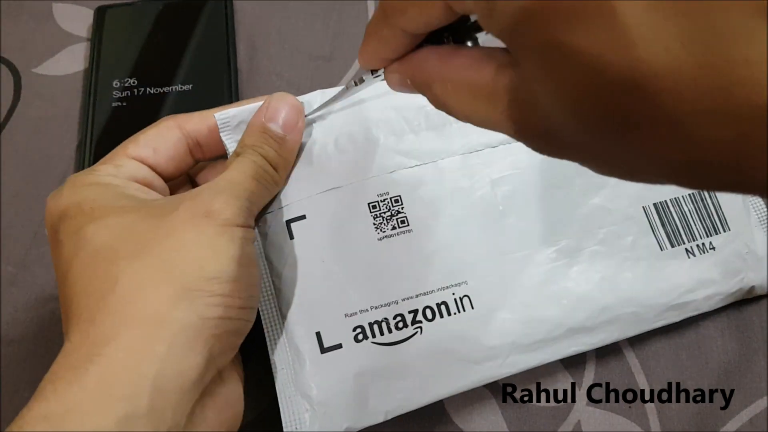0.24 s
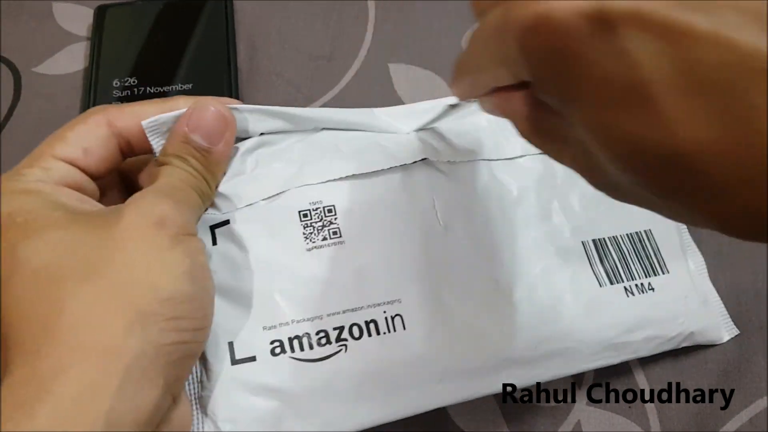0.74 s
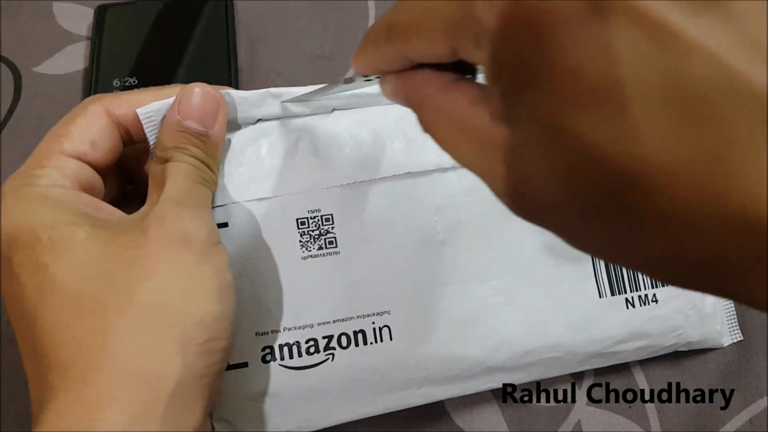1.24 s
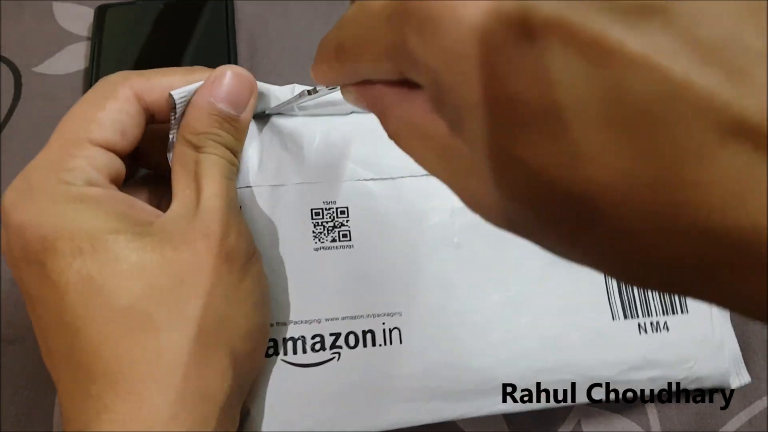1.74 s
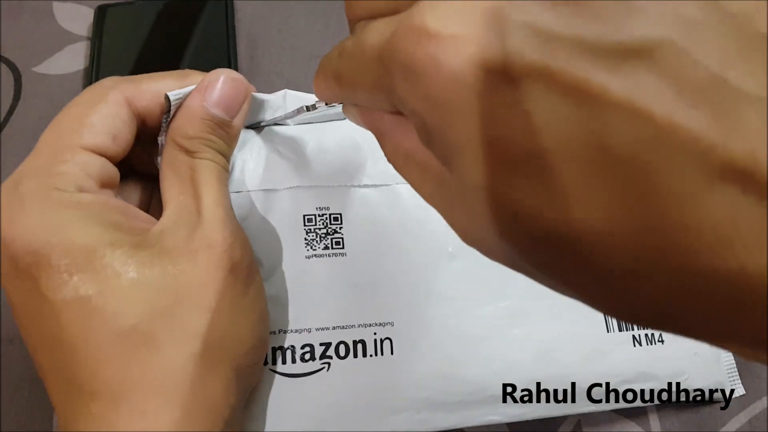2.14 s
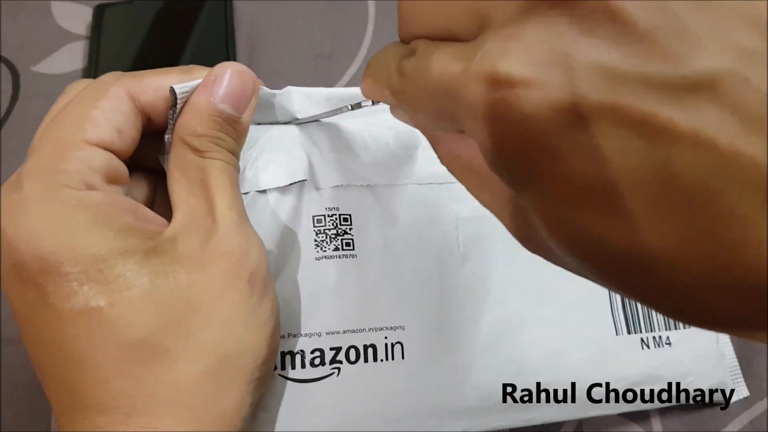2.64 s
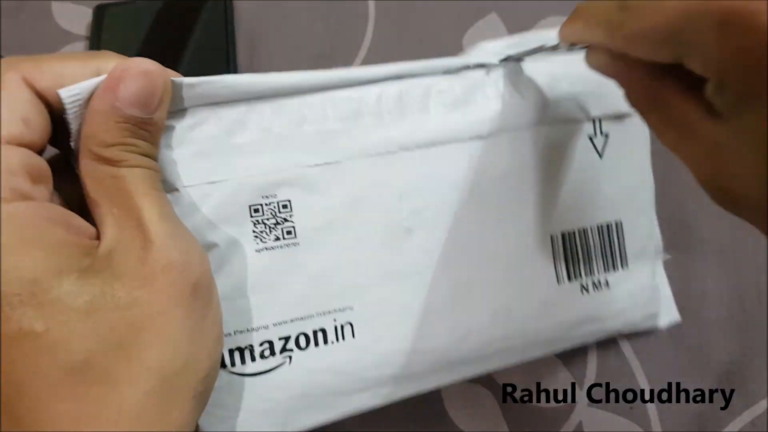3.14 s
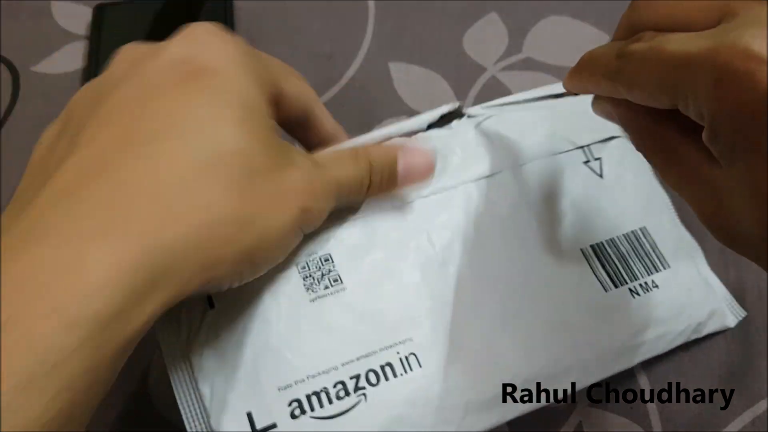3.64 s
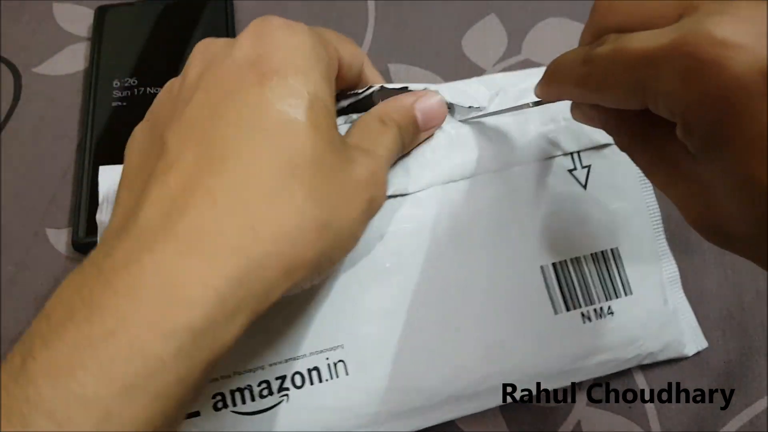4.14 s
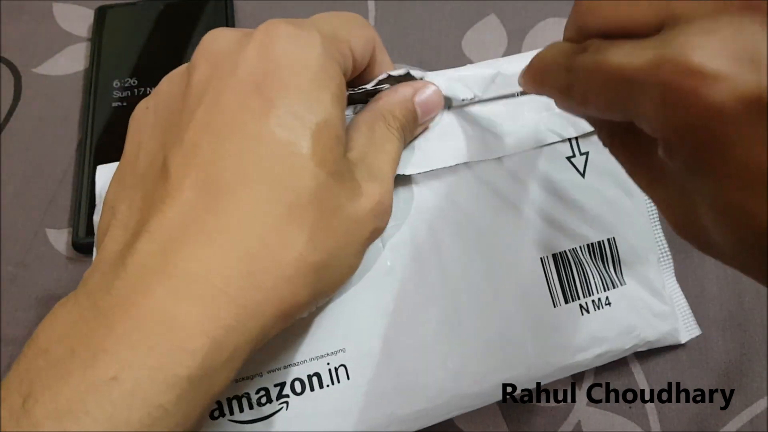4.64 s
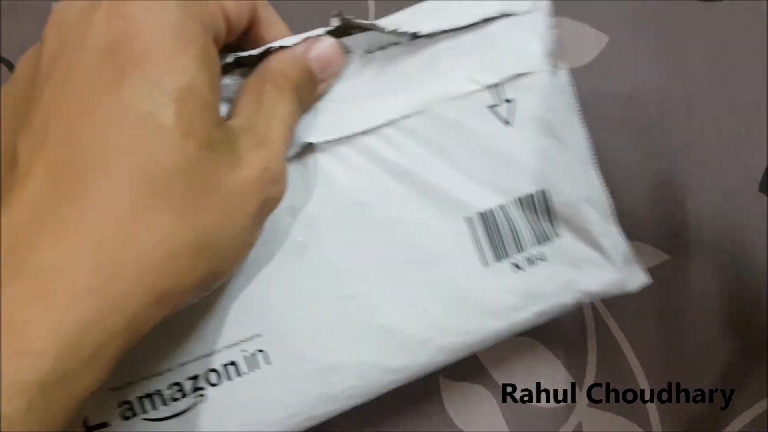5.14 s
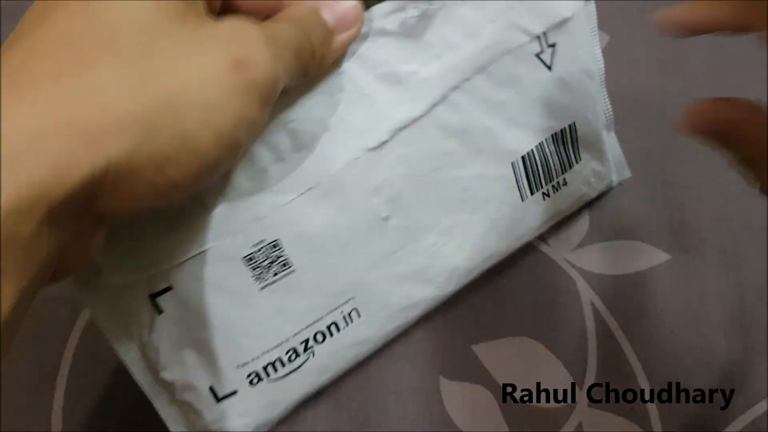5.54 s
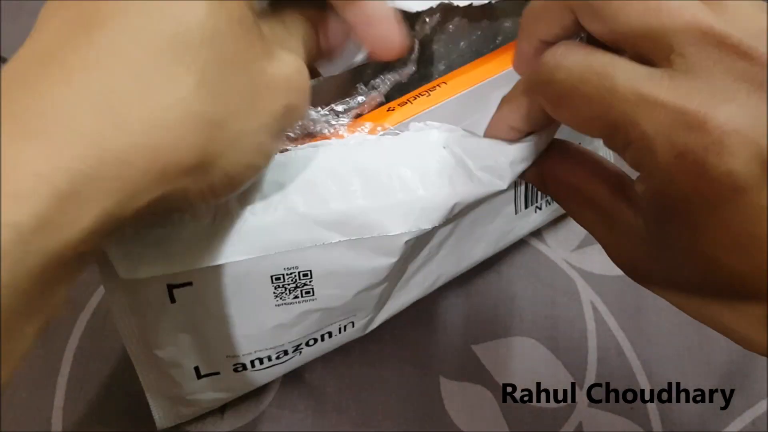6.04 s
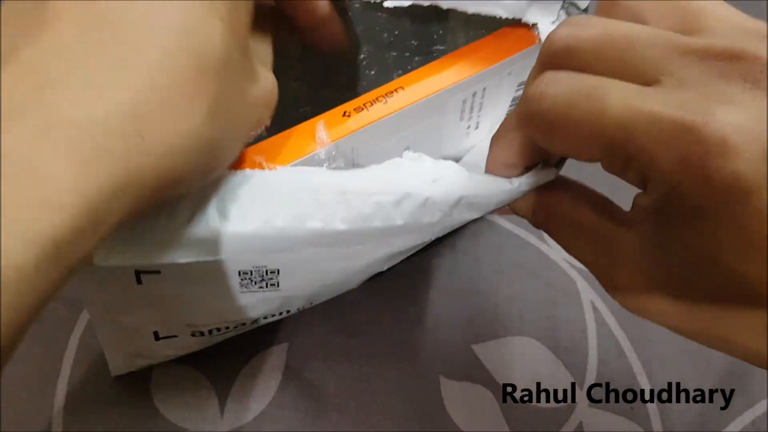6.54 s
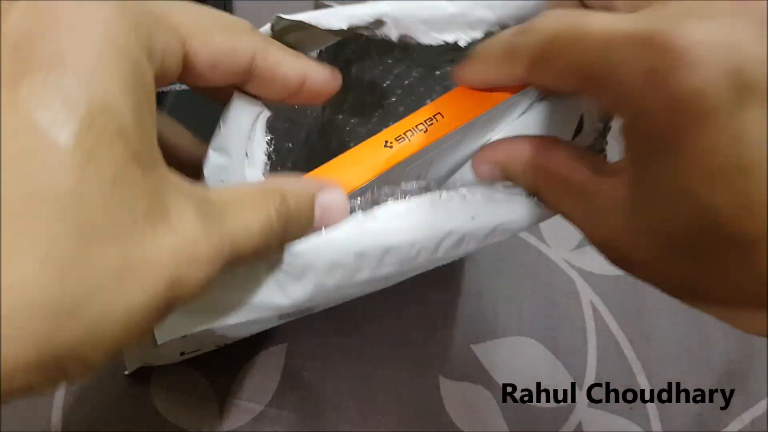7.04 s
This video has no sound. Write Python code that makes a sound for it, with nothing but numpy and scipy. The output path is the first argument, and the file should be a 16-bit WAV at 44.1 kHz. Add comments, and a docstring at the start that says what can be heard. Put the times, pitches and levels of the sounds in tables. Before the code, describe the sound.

A padded plastic mailer is slit and torn open close to a phone microphone in a soft room. Light crinkles and small snaps come first, then a dense rip near three seconds and a louder one near five. The bag slides briefly, lands with a soft low thud, and fingers rustle the film and bump a box inside. Faint rumble and intermittent hum lie beneath.

```python
"""A padded plastic mailer is slit with a knife and pulled open, close to a two-port phone microphone in a soft room.
From the start there is still air, a deep rumble and a low hum that comes and goes: filtered noise and a sine.
Fingers rustle the film, as creased noise, and it tears in runs of sharp snaps, densest near 3 s and 5 s: slips
that ring film and bag, answered by the room. From about 5 s a second low tone joins, the bag slides over the
sheet, fingertips bump the box inside, and the parcel thuds on the mattress, with a fainter thud just after."""
import sys
import numpy as np
from scipy import signal
from scipy.fft import rfft, irfft, next_fast_len
from scipy.io import wavfile
from scipy.ndimage import uniform_filter1d, map_coordinates

SR = 44100
rng = np.random.default_rng(int(sys.argv[2]) if len(sys.argv) > 2 else 0)


def file_out(sig):
    """Save sig as 16-bit WAV at sys.argv[1]."""
    # one column per channel
    cols = np.atleast_2d(sig).T
    # limit, then scale
    lim = np.clip(cols, -1, 1)
    pcm = np.round(lim * 32767).astype(np.int16)
    wavfile.write(sys.argv[1], SR, pcm)


def convert_level_to_amplitude(level_db):
    """Map a level in decibels to its linear amplitude factor."""
    exponent = np.asarray(level_db, float) / 20
    return 10 ** exponent


N = 321930  # length [samples]


def unit(x):
    """Scales a sound to rms 1."""
    return x / np.sqrt(np.mean(x ** 2) + 1e-20)


def along(points, hz):
    """Reads (frequency [Hz], value) points on a log frequency axis."""
    f, v = np.transpose(points)
    return np.interp(np.log(hz + 1), np.log(f + 1), v)


def level_curve(rows):
    """Draws (time [s], level [dB]) rows as one level per sample, -120 dB outside them."""
    s, db = np.transpose(rows)
    return np.interp(np.arange(N) / SR, s, db, left=-120, right=-120)


def wobble(rate):
    """A smooth random curve through normal draws, rate knots a second."""
    knots = rng.standard_normal(int(N * rate / SR) + 4)
    return map_coordinates(knots, [np.arange(N) * rate / SR])


def noise_pair():
    """Two unrelated white noises."""
    return rng.standard_normal((2, N))


def filtered(x, response):
    """Applies a complex response of frequency along the last axis."""
    n = x.shape[-1]
    m = next_fast_len(n + 4096)
    return irfft(rfft(x, m) * response(np.fft.rfftfreq(m, 1 / SR)), m)[..., :n]


def band(lo_hz, hi_hz):
    """The response of a causal band-pass."""
    sections = signal.butter(2, [lo_hz, hi_hz], "band", fs=SR, output="sos")
    return lambda f: signal.sosfreqz(sections, f, fs=SR)[1]


# how alike the two ports hear a diffuse sound: (frequency [Hz], correlation [0 to 1])
PORT_LIKENESS = [(60, 0.9), (240, 0.84), (950, 0.4), (3770, 0.02), (15000, 0.033)]


def coloured(pair, spectrum):
    """Filters and mixes two unrelated signals into stereo of rms 1, more alike in the bass."""
    def mid_side(hz):
        turn = np.arccos(np.clip(along(PORT_LIKENESS, hz), -1, 1)) / 2
        return convert_level_to_amplitude(along(spectrum, hz)) * [np.cos(turn), np.sin(turn)]
    mid, side = filtered(pair, mid_side)
    return unit(np.array([mid + side, mid - side]))


# colour of the still room: (frequency [Hz], relative gain [dB])
AIR_COLOUR = [(12, -53), (20, -18), (43, -0.5), (105, 7), (440, -7.5), (772, -7.5), (939, -13),
              (2370, -16.5), (4050, -22), (7300, -39), (8890, -22), (15200, -46), (16500, -49)]


def still_air():
    """Steady noise of the still room."""
    return convert_level_to_amplitude(-61.0) * coloured(noise_pair(), AIR_COLOUR)


# the deep rumble rising and sinking: (time [s], level [dB])
RUMBLE_LEVEL = [(0, -63), (0.12, -50), (0.87, -65), (1.1, -74), (2.9, -74), (3.09, -63), (3.3, -86),
                (4.06, -65), (4.39, -64), (4.9, -70), (5.37, -82), (5.51, -46), (5.8, -66), (7.3, -72)]


def deep_rumble():
    """Noise below about 90 Hz that follows a drawn level."""
    colour = [(15, -8), (28, -15), (33, 1.0), (38, -34), (60, -5), (90, -87)]  # Hz, dB
    return convert_level_to_amplitude(level_curve(RUMBLE_LEVEL)) * coloured(noise_pair(), colour)


def tone(hz, tables, waver_hz):
    """A low sine of slightly wavering pitch; its tables give rms levels."""
    phase = 2 * np.pi * np.cumsum(hz + waver_hz * wobble(5)) / SR
    loudness = sum(convert_level_to_amplitude(level_curve(rows)) for rows in tables)
    return np.sqrt(2) * loudness * np.sin(phase)


# three stretches of the hum, each a list of (time [s], rms level [dB])
HUM_LEVELS = [
    [(0.0, -58), (0.2, -52.5), (0.5, -61), (0.6, -66)],
    [(1.46, -82), (1.55, -51.5), (1.776, -56.5), (2.21, -48), (2.424, -48.5), (2.648, -62), (2.78, -53.5),
     (2.9, -51.5), (3.15, -76)],
    [(3.45, -78), (3.55, -60), (3.698, -53), (4.6, -54.5), (4.75, -52.5), (5.0, -57)],
]


def hum():
    """A low sine that comes and goes."""
    return tone(90.5, HUM_LEVELS, waver_hz=0.62)


# each grip or stroke on the film: (start time [s], hold [s], rustle level [dB], hiss level [dB])
FINGER_GRIPS = [(0, 0.04, -53.5, -60), (0.217, 0.088, -67, -92), (0.359, .08, -59, -64),
                (0.601, .16, -49, -48.5), (0.817, 0.1, -54, -60.5), (0.903, 0.05, -51, -56),
                (1.266, 0.035, -58, -65), (1.36, 0.17, -54, -59), (1.52, 0.31, -60, -58.5),
                (1.784, 0.24, -59, -66.5), (2.03, 0.48, -67.5, -69.5), (2.407, 0.034, -62.5, -66),
                (2.503, 0.027, -57, -60), (2.612, 0.16, -56.5, -60), (2.776, 0.066, -39.5, -42),
                (2.89, 0.044, -46.5, -66), (2.972, 0.077, -40, -40), (3.1, 0.093, -56.5, -54.5),
                (3.25, .15, -62.5, -60), (3.508, 0.28, -74, -79.5), (3.708, 0.12, -54, -59.5),
                (3.854, 0.23, -53.5, -59), (4.13, .1, -55, -55.5), (4.288, 0.18, -60.5, -61),
                (4.53, 0.042, -58.5, -61.5), (4.698, 0.18, -57.5, -59.5), (4.846, .12, -41, -37.5),
                (5.014, 0.073, -50.5, -70), (5.197, 0.2, -50, -57), (5.446, 0.23, -54, -64),
                (5.7, 0.15, -52.5, -57), (5.843, 0.17, -47, -47), (6.062, .12, -54, -52.5),
                (6.29, 0.13, -47, -47.5), (6.457, 0.11, -46.5, -47), (6.628, 0.13, -54, -52.5),
                (6.836, 0.18, -55.5, -58.5), (6.975, 0.2, -56, -52), (7.166, 0.1, -57.5, -49)]
GRIP_S, REST_DB = 0.011, -76.5  # rise; level with hands still
SAG_DB_PER_S, LET_GO_DB_PER_S = 7.5, 147  # while held; after


def handling():
    """Rustle and hiss in dB: every grip sets in fast, sags while held and fades when let go."""
    start, hold, *levels = np.transpose(FINGER_GRIPS)[..., None]
    since = np.arange(0, N, 64) / SR - start
    loss_db = SAG_DB_PER_S * np.clip(since, 0, hold) + LET_GO_DB_PER_S * np.maximum(since - hold, 0)
    shape = np.clip(since / GRIP_S, 0, 1) * convert_level_to_amplitude(-loss_db)
    power = np.sum((convert_level_to_amplitude(levels) * shape) ** 2, axis=1) + convert_level_to_amplitude(REST_DB) ** 2
    return np.repeat(10 * np.log10(power), 64, axis=1)[:, :N]


def crinkles(per_s, middle_hz, spread_db, cycles):
    """Tiny creases in clumps, each a few cycles at its own pitch; two sets of rms 1 share the clumps."""
    chance = per_s * convert_level_to_amplitude(4 * np.tile(wobble(25), 2)) / SR
    at = np.flatnonzero(rng.random(2 * N) < chance)
    hz = middle_hz * np.exp(.55 * rng.standard_normal((len(at), 1)))
    size = convert_level_to_amplitude(spread_db * np.minimum(rng.exponential(size=(len(at), 1)), 3))
    turns = hz * np.arange(200) / SR  # cycles gone by
    grain = size * np.sqrt(hz) * turns * np.exp(-3 * turns / cycles) * np.sin(2 * np.pi * turns)
    index = at[:, None] + np.arange(200)
    laid = np.bincount(index.ravel(), grain.ravel(), 2 * N + 200)
    return unit(laid[:2 * N].reshape(2, N))


def crackle(per_s, spread_db, life_s, smooth):
    """Noise chopped into tiny creases of uneven size, in clumps, over a smooth share."""
    size_db = spread_db * np.minimum(rng.exponential(size=N), 3)
    creases = (rng.random(N) < per_s * convert_level_to_amplitude(4 * wobble(30)) / SR) * convert_level_to_amplitude(size_db)
    fading = signal.lfilter([1], [1, -np.exp(-1 / (life_s * SR))], creases)
    return (smooth + unit(fading)) * noise_pair()


# colour of the rubbed film: (frequency [Hz], relative gain [dB])
RUSTLE_COLOUR = [(120, -44), (300, -0.5), (450, -8), (750, -8.5), (1100, -10), (1390, -8), (1750, -11),
                 (2500, -10), (3500, -18.5), (6000, -21), (9000, -75)]
# colour of the skin's hiss: (frequency [Hz], relative gain [dB])
HISS_COLOUR = [(1760, -20), (3000, -5), (4410, -3.5), (5700, -7), (14500, -7), (16200, -16), (16500, -37)]
FLICKER_DB = 0.5  # the grip is never even


def rustle():
    """Fingers crease and rub the film: pitched crinkles over dull rubbing, and fine hiss from the skin."""
    flicker_db = FLICKER_DB * np.array([wobble(14), wobble(14)])
    rustle_db, hiss_db = handling() + flicker_db
    rubbing = noise_pair() + .55 * crinkles(350, 1675, 2.55, cycles=2.76)
    body = convert_level_to_amplitude(rustle_db) * coloured(rubbing, RUSTLE_COLOUR)
    fine = convert_level_to_amplitude(hiss_db) * coloured(crackle(900, 4, .001, .9), HISS_COLOUR)
    return (body + fine) * convert_level_to_amplitude([[.8], [-.8]])  # a little to the left


SHIFT_DB, SHIFT_GROWS, SHIFT_SLOW_S = -58, 0.61, 0.45  # at a rustle of -58 dB; dB per dB; smoothing


def shifting():
    """The parcel shifts on the bed as the fingers work: low noise that follows the smoothed rustle."""
    smooth_db = uniform_filter1d(handling()[0], round(SHIFT_SLOW_S * SR))
    shift_db = SHIFT_DB + SHIFT_GROWS * (smooth_db + 58)
    colour = [(50, -7.5), (100, 3.5), (170, -0.3), (300, -6.5), (500, -33)]  # Hz, dB
    return convert_level_to_amplitude(shift_db + 1.16 * wobble(12)) * coloured(noise_pair(), colour)


# the clearest snaps of the film:
# (time [s], crack level [dB rms], crack pitch [Hz], body over crack [dB], treble over crack [dB])
CLEAR_SNAPS = [(0.2101, -31, 1800, 2, -10), (0.3687, -45, 3350, -4, -7), (0.4645, -41.5, 1370, -7, -31),
               (0.5534, -41, 4330, -29, 0), (0.6, -49, 4100, -1, 7), (0.6328, -42, 2530, -2, -19),
               (0.659, -39.5, 2060, 3.5, 4), (0.671, -34, 1440, -2, -15), (0.7269, -34.5, 2840, -13, 3),
               (0.7418, -36, 2670, -4.5, -8), (0.7761, -42.5, 2480, -5, -7), (1.0131, -50.5, 2360, -15, 8),
               (1.0865, -47.5, 2140, -16, -1.5), (1.35, -48.5, 2680, -1, 4.5), (1.4352, -42, 2640, 0, -8),
               (1.5458, -40, 1680, 3, -16), (1.5823, -47.5, 1290, 6, -15), (1.596, -45.5, 2140, -12, 4.5),
               (1.663, -39.5, 1520, -4, -9), (1.7176, -39.5, 2820, -7, -29), (1.7305, -48, 1870, 2, -5),
               (1.8831, -43, 2380, -3, -24), (2.095, -47.5, 2450, -11, -21), (2.189, -55, 3000, -19, 1),
               (2.318, -52.5, 1670, -8, -15), (2.3827, -46.5, 1890, -23, -7),
               (2.4156, -33.5, 4700, -12.5, -18), (2.469, -46, 3810, -15, -6), (2.4909, -37, 3380, -13, 0),
               (2.5219, -34.5, 2620, -10, 0), (2.6385, -46, 3230, -2, 3), (2.6438, -29.5, 1980, -5, -4),
               (2.6618, -29, 3800, 0, 3.5), (2.708, -34.5, 2500, -15, -1), (2.7425, -40.5, 3440, -2, 3),
               (2.7748, -39.5, 3440, 2, -5), (2.7874, -31, 2400, 3, 6), (2.791, -29, 2880, 0, 5.5),
               (2.7941, -26.5, 3010, 1.5, 1), (2.8011, -26.5, 2810, -9, -8), (2.8151, -28.5, 2490, 4, 7.5),
               (2.8191, -27, 2830, 3, 4), (2.826, -19.5, 3040, -4.5, 0), (2.837, -24.5, 2220, 4, 0),
               (2.9716, -31, 1930, 6, 2.5), (2.9795, -36, 2980, 2, 5), (2.9983, -23, 2430, -4, 4),
               (3.0024, -24, 2280, -6, -10), (3.0241, -19.5, 2140, -2.5, -4), (3.031, -26, 1990, 0.5, 2.5),
               (3.035, -23.5, 2450, 1.5, -3), (3.0775, -18.5, 2510, -1, -0.5), (3.281, -50, 1380, -5, -11),
               (3.394, -45.5, 3100, -1, 1), (3.431, -47, 1880, -12, -13), (3.565, -47, 1750, -15, -20),
               (3.793, -48, 1600, -13, -20), (3.8562, -39, 1930, 0, -20), (3.9539, -46, 3270, -9, -3),
               (4.1977, -39.5, 1570, -10.5, -11), (4.285, -43, 1790, -25, -16),
               (4.342, -46.5, 1760, -17, -15), (4.3748, -47, 1760, -10, -12), (4.4197, -46, 1720, -21, -19),
               (4.543, -45.5, 1460, 4, -22), (4.583, -40.5, 2390, -7, -1), (4.591, -32, 2200, 0.5, 0),
               (4.6995, -40.5, 1340, -6, -16), (4.846, -25, 2210, -1, -2.5), (4.861, -22.5, 1720, 4, -0.5),
               (4.8717, -28, 1830, 3, 8), (4.8836, -19, 2840, -6.5, -8), (4.8926, -24, 2160, 2, -8),
               (4.8947, -12.5, 3780, -9.5, -11), (4.901, -18, 2520, 0, -10), (4.9086, -23, 1810, 4.5, -2),
               (4.9165, -19, 2290, -1, -9), (4.9247, -20.5, 3220, 0.5, -3), (4.9335, -27.5, 2090, 2.5, 0.5),
               (4.945, -29, 3380, -12, 2), (4.95, -27.5, 4020, -12, -2), (4.9624, -23.5, 4260, -24, -10),
               (4.9664, -28.5, 2290, 6.5, 8.5), (4.9809, -25.5, 1540, 4.5, 0), (4.9849, -29, 2840, 4, 3.5),
               (5.001, -41, 1660, -7, -8), (5.209, -53, 1720, 0, 3), (5.2856, -49, 1530, 1, -3),
               (5.3673, -42.5, 1590, 1, -1.5), (5.727, -47, 2110, 5.5, -2), (5.7864, -38, 2150, -2, -8),
               (5.8484, -44, 2060, 8, -4), (5.872, -36.5, 2260, -7, -5), (5.9348, -32.5, 2220, -10.5, -7),
               (5.9872, -28.5, 1750, -6, -8.5), (6.002, -39, 1910, -7, 2), (6.0358, -40, 2620, -22.5, -8),
               (6.181, -43.5, 3360, -10, 2.5), (6.2615, -40.5, 2700, -6, 0), (6.298, -44, 1520, -10, -16),
               (6.3216, -41, 2310, -10, -15), (6.3761, -28.5, 2500, -4, -0.5),
               (6.3924, -32.5, 4100, -9, -4), (6.405, -26, 1410, -10.5, -8.5), (6.5065, -33, 2120, -23, -1),
               (6.5265, -37, 2920, -5, -15), (6.5528, -41, 1870, -5, -1), (6.5809, -39.5, 1610, -11, -10),
               (6.6851, -51.5, 3720, -3, 9), (6.7584, -40.5, 3500, -25, -15), (7.0733, -43, 1740, -20, -6),
               (7.204, -40.5, 2500, -14, 0), (7.273, -30.5, 1450, -15, -17)]
TICK_DB, TICK_GROWS, TICK_SPREAD_DB = -52, 0.63, 2.5  # least tick at a rustle of -55 dB; dB per dB; size scatter
TICK_BODY_DB, TICK_TREBLE_DB = -6.5, -10.5  # over the crack; the treble also follows hiss over rustle
TICK_HZ, TICK_COLOUR_DB = 2110, 5  # middle pitch; scatter of body and treble
LEFT_DB, LEFT_PER_OCTAVE_DB, LEFT_SCATTER_DB = 5, 4, 2  # left minus right; higher cracks lie further left


def snap_rows():
    """The clear snaps and 200 random ticks, stronger when the fingers work harder, placed between the ports."""
    draw = rng.standard_normal((200, 3))
    s, size = rng.random((200, 2)).T * [[N / SR], [.95]]
    rustle_db, hiss_db = handling()[:, (s * SR).astype(int)]
    effort_db = np.minimum(rustle_db, -48) + 55
    db = TICK_DB + TICK_GROWS * effort_db - TICK_SPREAD_DB * np.log(1 - size)
    hz = TICK_HZ * np.exp(0.4 * draw[:, 0])
    body_db = TICK_BODY_DB + TICK_COLOUR_DB * draw[:, 1]
    treble_db = TICK_TREBLE_DB + 0.84 * (hiss_db - rustle_db) + TICK_COLOUR_DB * draw[:, 2]
    rows = np.vstack([np.transpose([s, db, hz, body_db, treble_db]), CLEAR_SNAPS])
    octaves = np.log2(rows[:, 2] / TICK_HZ)
    pan_db = LEFT_DB + LEFT_PER_OCTAVE_DB * octaves + LEFT_SCATTER_DB * rng.standard_normal(len(rows))
    return np.column_stack([rows, pan_db])


# resonances of the air-filled bag: (frequency [Hz], width [Hz], relative level [dB])
BAG_MODES = [(220, 140, -6), (348, 195, -5), (772, 308, 1)]


def bag(f):
    """The bag's resonances, summed with alternating sign."""
    return sum((-1) ** k * convert_level_to_amplitude(db) * 1j * f * w / (c * c - f * f + 1j * f * w)
               for k, (c, w, db) in enumerate(BAG_MODES))


def panel(hz, sharpness):
    """One resonance for each row, applied twice: the patch of film that a crease sets ringing."""
    centre = np.asarray(hz)[:, None]
    return lambda f: (1j * f * centre / sharpness / (centre ** 2 - f * f + 1j * f * centre / sharpness)) ** 2


LEAD_IN = 0.21  # faint splintering on both sides of a slip
BAG_SQUEEZE = 0.096  # the hands reshape the bag: scatter of its pitch from snap to snap, natural log
SPLINTER, SPLINTER_S = .15, .0012  # noise around the slip of a crack; its fall


def snaps(rows, splinter):
    """Each snap is one sharp slip amid brief splintering: a crack, its treble, and a blow on the bag."""
    s, db, hz, body_db, treble_db, pan_db = np.transpose(rows)
    lead, span = 132, 100  # samples before the slip; samples over which a level counts
    t = (np.arange(768) - lead) / SR
    noise = np.stack([rng.standard_normal((5, len(t))) for _ in s], axis=1)
    slip = np.sign(noise[0, :, :1]) * (t == 0)

    def burst(fall_s):
        main = np.exp(np.where(t < 0, t / .0004, -t / fall_s))
        return splinter * (main + LEAD_IN * np.exp(-abs(t) / .003))

    def level(x):
        return x / np.sqrt(np.sum(x ** 2, axis=-1, keepdims=True) / span)

    squeeze = np.exp(BAG_SQUEEZE * noise[0, :, 1:2])
    body = level(filtered(slip + 0.089 * noise[0] * burst(0.00055), lambda f: bag(f * squeeze)))
    # the ports share the slip and part of the crack's splintering, but none of the treble's
    crack_noise = noise[1] + 0.5 * noise[2] * [[[1]], [[-1]]]
    crack = level(filtered(slip + SPLINTER * crack_noise * burst(SPLINTER_S), panel(hz, sharpness=0.72)))
    treble = level(filtered(slip + .2 * noise[3:5] * burst(.0005), band(4600, 18000)))
    side = convert_level_to_amplitude(pan_db / 2 * np.array([[1], [-1]]))[..., None]
    sharp = convert_level_to_amplitude(db)[:, None] * crack + convert_level_to_amplitude(db + treble_db)[:, None] * treble
    sound = convert_level_to_amplitude(db + body_db)[:, None] * body * side ** 0.4 + side * sharp  # the body is panned less
    at = (np.round(s * SR).astype(int)[:, None] + np.arange(len(t))).ravel()
    return np.array([np.bincount(at, ear.ravel(), N + len(t))[lead:N + lead] for ear in sound])


# how long the room rings: (frequency [Hz], time to fall by 60 dB [s])
ROOM_DECAY = [(200, 0.12), (600, 0.54), (1500, 0.19), (4000, 0.42), (10000, 0.26)]
# colour of the room's answer: (frequency [Hz], gain [dB])
ECHO_COLOUR = [(250, 1.5), (420, -13.5), (700, -9.5), (1200, -4), (1750, -7.5), (2600, -8.5), (3800, -12),
               (8000, -9.5), (14000, -16)]


def room(x):
    """The answer sets in at once, then each frequency dies at its own speed; redrawn every eighth of a second."""
    out, hop = np.zeros((2, N + SR)), SR // 8
    for start in range(0, N, hop):
        hz, t, z = signal.stft(rng.standard_normal((2, SR // 3)), SR, nperseg=256)
        alike = np.clip(along(PORT_LIKENESS, hz), 0, 1)[:, None]
        z[1] = alike * z[0] + np.sqrt(1 - alike ** 2) * z[1]
        build_up = 1 - np.exp(-(t + 0.027) / 0.004)
        fading = build_up * convert_level_to_amplitude(-60 * t / along(ROOM_DECAY, hz)[:, None])
        tail = signal.istft(z * fading, SR, nperseg=256)[1]
        answer = signal.fftconvolve(x[None, start:start + hop], tail / np.linalg.norm(tail[0]), axes=1)
        out[:, start + 350:][:, :answer.shape[1]] += answer  # 350 samples late
    return filtered(out[:, :N], lambda hz: convert_level_to_amplitude(along(ECHO_COLOUR, hz)))


# the second low tone: (time [s], rms level [dB])
DRONE_LEVEL = [(5.05, -80), (5.12, -55), (5.5, -54), (5.6, -66), (6.0, -57.5), (6.3, -59), (6.4, -89)]


def drone():
    """A low sine, higher than the hum."""
    return tone(167, [DRONE_LEVEL], waver_hz=1.13)


# the bag slides over the sheet: (time [s], middle level [dB])
SLIDE_LEVEL = [(5.2, -60), (5.215, -56.5), (5.4, -51.5), (5.55, -59), (5.7, -69), (5.75, -84)]
# resonances of the taut film: (frequency [Hz], relative gain [dB])
TAUT_FILM_COLOUR = [(600, -40), (1150, -8), (1390, 5), (1650, -33), (2250, -4), (2550, -14), (2860, -6),
                    (3400, -15), (5000, -60)]


def slide():
    """Friction noise of slightly wavering level sings through the taut film's resonances."""
    return convert_level_to_amplitude(level_curve(SLIDE_LEVEL) + 1.1 * wobble(34)) * coloured(noise_pair(), TAUT_FILM_COLOUR)


# fingertips on the box inside: (time [s], level, about 4 dB above the swell's peak [dB], pitch [Hz])
FINGERTIP_BUMPS = [(5.209, -43, 170), (5.328, -32, 183), (5.479, -43, 164), (5.557, -34.5, 159),
                   (5.704, -40, 322), (5.789, -38.5, 277), (5.845, -36, 260), (5.993, -41, 140),
                   (6.073, -35.5, 220), (6.25, -45, 159), (6.359, -33, 207), (6.462, -48, 140),
                   (6.524, -41, 297), (6.669, -41, 210), (6.844, -55, 167), (7.037, -38, 200)]


def bumps():
    """Soft fingertips: a dull ring of a few cycles."""
    out, t = np.zeros(N + SR), np.arange(SR // 8) / SR
    swell = t / 0.0061 * np.exp(1 - t / 0.0038)
    for s, db, hz in FINGERTIP_BUMPS:
        out[round(s * SR):][:len(t)] += convert_level_to_amplitude(db) * swell * np.sin(2 * np.pi * hz * t)
    return out[:N]


# the parcel lands: (time [s], peak level of the swell [dB], pitch [Hz], rise [s])
PARCEL_THUDS = [(5.497, -30.5, 82.5, 0.017), (5.645, -46.5, 89, 0.033)]


def thuds():
    """The parcel drops on the mattress: a soft low swing that swells and dies."""
    out, t = np.zeros(N + SR), np.arange(SR // 4) / SR
    for s, db, hz, rise in PARCEL_THUDS:
        swell = (t / rise * np.exp(1 - t / rise)) ** 1.03 * np.exp(-(t / 0.21) ** 4)
        out[round(s * SR):][:len(t)] += convert_level_to_amplitude(db) * swell * np.sin(2 * np.pi * hz * t)
    return out[:N]


LEAD = 5  # samples by which the left port hears the snaps first


def scene():
    """The bag lies nearer the left port; the walls blur the splintering and return only each snap's broad colour."""
    background = still_air() + deep_rumble() + hum() + drone()
    rows = snap_rows()
    left, right = snaps(rows, splinter=1)
    film = np.array([left, np.pad(right, (LEAD, 0))[:N]])
    answer = room(snaps(rows, splinter=0).mean(axis=0))
    return background + rustle() + shifting() + film + answer + slide() + bumps() + thuds()


def band_limit(x):
    """A steep low-pass at the top of the band."""
    return signal.sosfilt(signal.butter(12, 16970, fs=SR, output="sos"), x)


TOP_HZ = 15950  # the phone's treble drops away around here
OFFSET = -.0005  # steady offset of the converter


def record(dry):
    """The phone's soft overload towards a ceiling of 0.95, its band limit and its converter's offset."""
    rounded = dry / (1 + np.abs(dry / .95) ** 4) ** (1 / 4)
    heard = filtered(rounded, lambda hz: convert_level_to_amplitude(np.interp(hz, [TOP_HZ - 250, TOP_HZ + 250], [0, -22])))
    mix = heard + OFFSET
    return band_limit(mix)


dry = scene()
out = record(dry)
file_out(out)
```